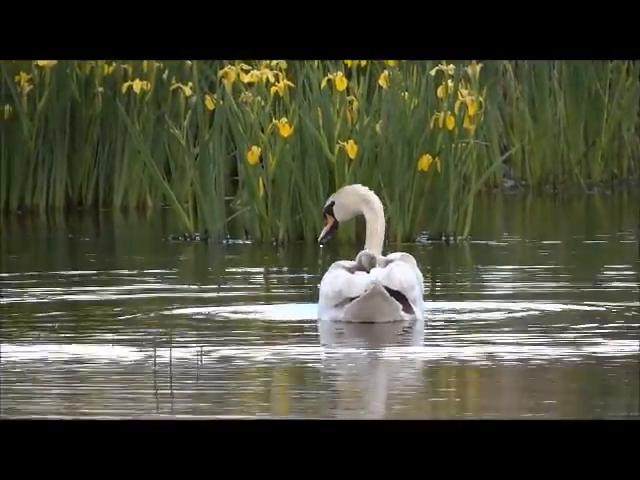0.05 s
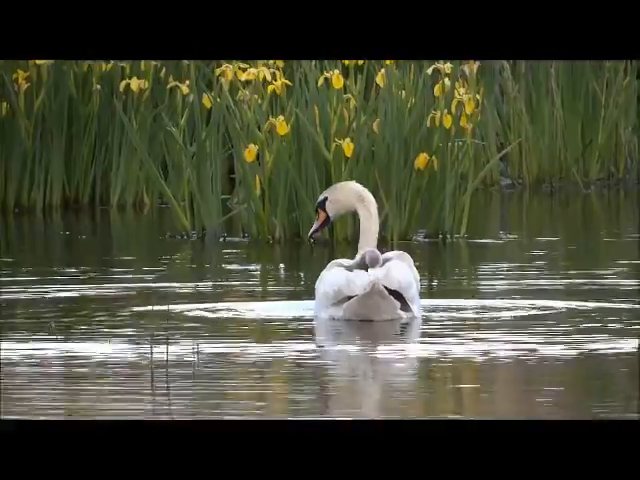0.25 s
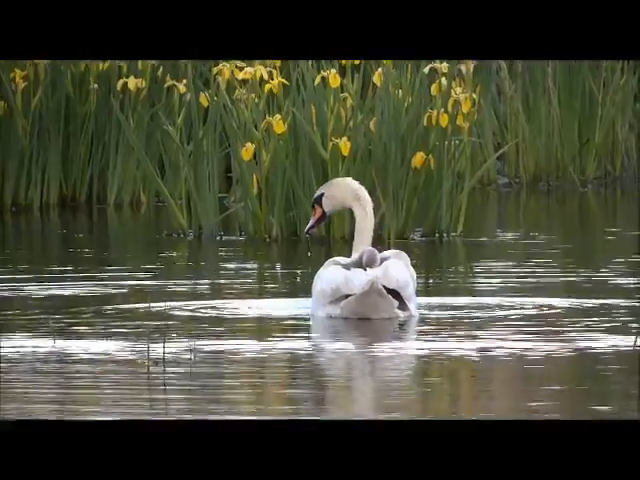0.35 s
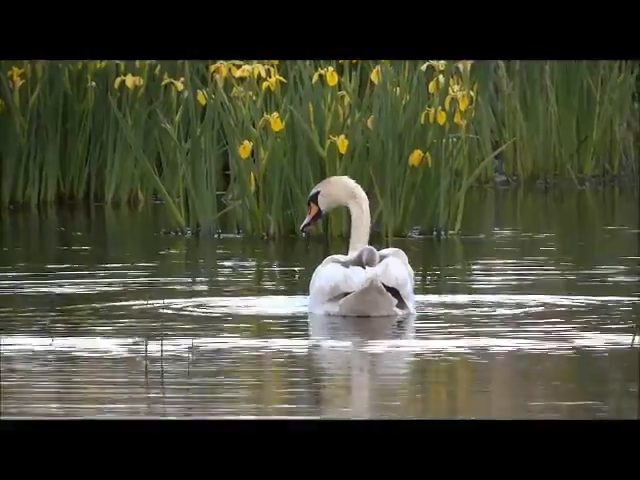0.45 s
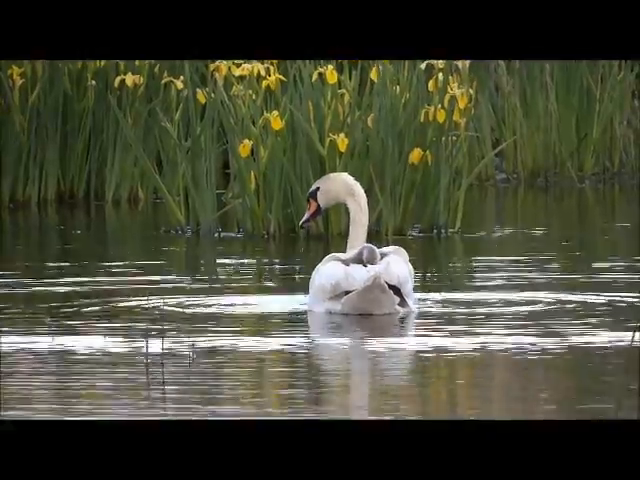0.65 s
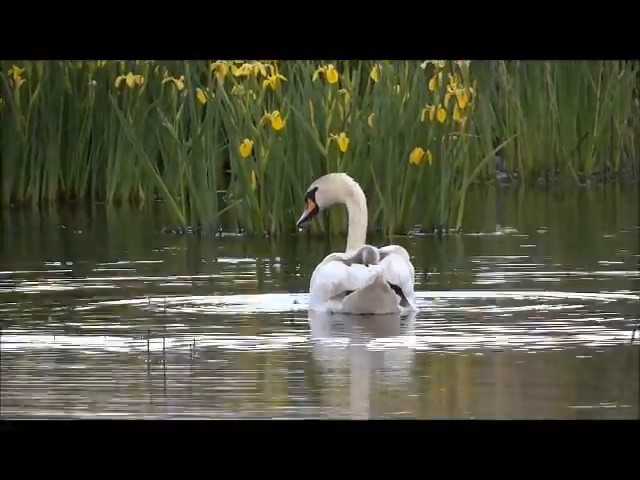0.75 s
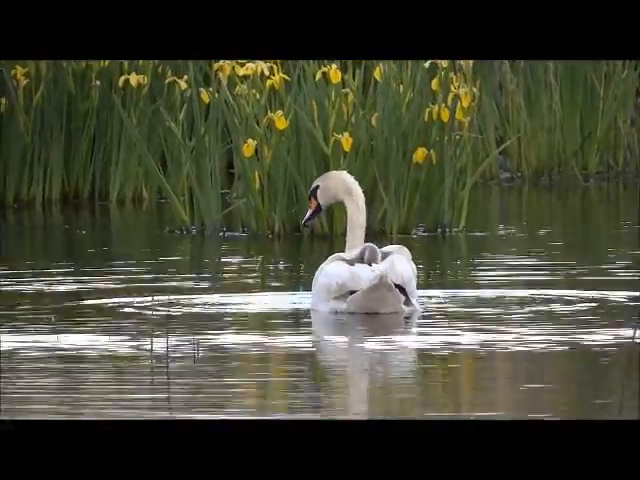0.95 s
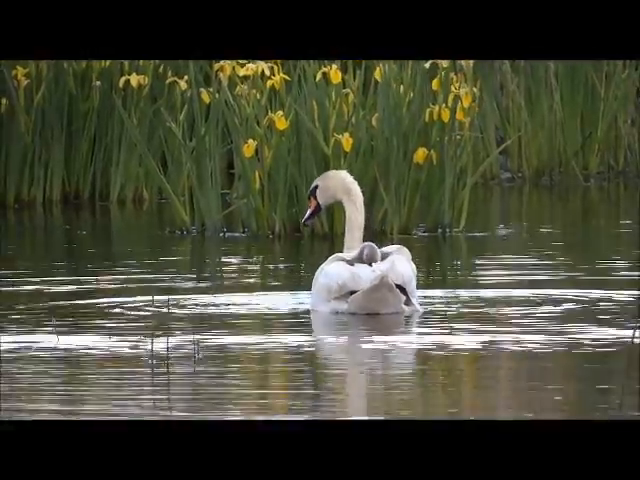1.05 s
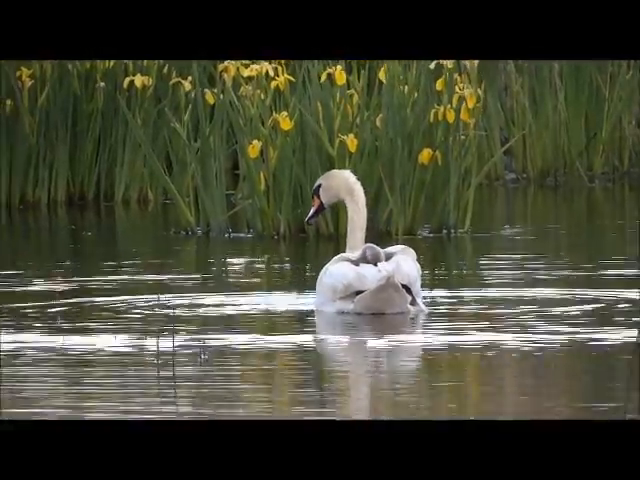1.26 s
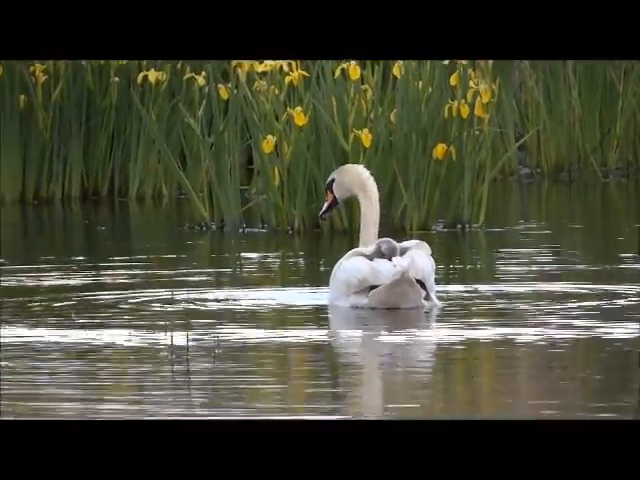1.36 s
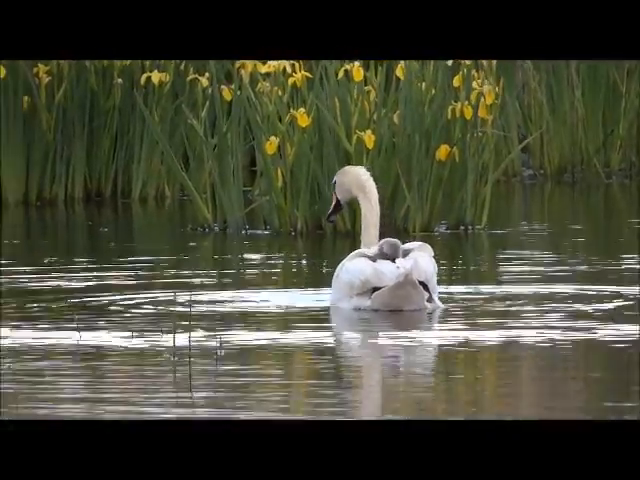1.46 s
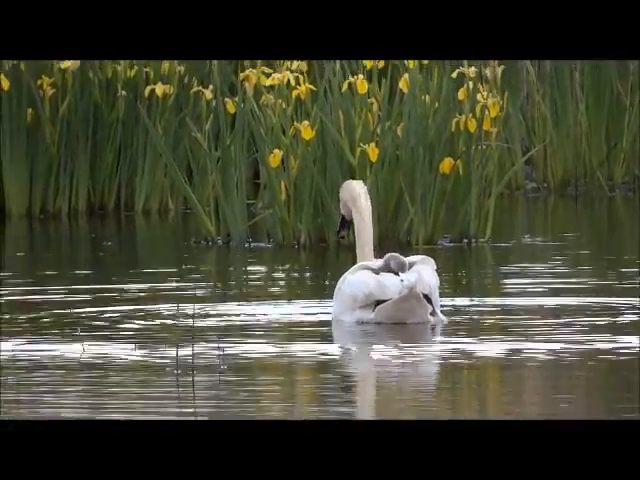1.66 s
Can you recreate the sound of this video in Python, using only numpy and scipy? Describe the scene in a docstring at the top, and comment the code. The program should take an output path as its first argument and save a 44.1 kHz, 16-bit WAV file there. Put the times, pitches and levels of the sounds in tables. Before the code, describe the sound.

One sharp swan snort on a quiet pond, then faint chirps and microphone handling clicks.

```python
"""Swan snort on a quiet pond

A swan gives one short, hissing snort: quick spurts of air through its resonant airway.
Further off a small bird whistles arched chirps and slurs; both echo from the banks.
Close by, a handled camera clicks, knocks and rubs, all over a soft outdoor wash."""
import sys
import numpy as np
from scipy import signal
from scipy.fft import rfft, irfft
from scipy.io import wavfile
from scipy.ndimage import uniform_filter1d

SR = 44100
rng = np.random.default_rng(int(sys.argv[2]) if len(sys.argv) > 2 else 0)


def master(y):
    """Save y as 16-bit WAV."""
    cut = np.clip(np.atleast_2d(y).T, -1, 1)
    pcm = np.round(cut * 32767)  # scale
    wavfile.write(sys.argv[1], SR, pcm.astype(np.int16))


N = 74970
TIME_S = np.arange(N) / SR
FREQ_HZ = np.fft.rfftfreq(N, 1 / SR)


def amp(db):
    """Decibels to gain."""
    return 10 ** (np.asarray(db) / 20)


def unit(x):
    """Scale to rms 1."""
    return x / np.sqrt(np.mean(x ** 2) + 1e-20)


def curve(points, hz=FREQ_HZ):
    """Table interpolated over log frequency."""
    f, value = np.transpose(points)
    return np.interp(np.log(hz + 1), np.log(f + 1), value)


def fader(points):
    """Gain over time from a dB curve."""
    return amp(np.interp(TIME_S, *np.transpose(points)))


def pan(db):
    """Stereo gains for a left-minus-right level."""
    return amp(np.array([[.5], [-.5]]) * db)


def noise(gain, correlation):
    """Stereo noise, rms 1, of given spectral shape and L/R correlation."""
    mid, side = rfft(rng.standard_normal((2, N)))
    alike = np.clip(curve(correlation), -1, 1)
    mid, side = mid * np.sqrt(1 + alike), side * np.sqrt(1 - alike)
    return unit(irfft(np.array([mid + side, mid - side]) * gain, N))


def burst(start, rise, t60):
    """Envelope: linear rise, exponential fall."""
    t = TIME_S - start
    return np.clip(t / rise, 0, 1) * np.exp(-np.log(1000) * np.maximum(t - rise, 0) / t60)


def ring(start, hz, t60, rise_s=0.00098):
    """One decaying mode."""
    return burst(start, rise_s, t60) * np.sin(2 * np.pi * hz * (TIME_S - start))


# wash spectrum: f/Hz, relative level/dB
WASH_SPECTRUM = [(15, -17), (25, -6.5), (70, -2.5), (405, -5.5), (560, -4.5), (936, -8), (1790, -11.5),
                 (2350, -13.5), (2760, -15), (3430, -17.5), (4400, -17.5), (4950, -22), (11300, -28.5),
                 (16000, -32.5)]
# wash envelope: t/s, level/dB
WASH_ENVELOPE = [(0, -47), (.17, -48.5), (.6, -49), (1.0, -50), (1.25, -49), (1.35, -47.5), (1.55, -49.5),
                 (1.7, -49.5)]
# outdoor stereo field: f/Hz, L/R correlation
OUTDOOR_CORRELATION = [(30, 0.95), (120, 0.91), (300, 0.14), (700, 0.12), (2000, 0.4), (5000, 0.63),
                       (9000, 0.96), (12000, 1)]

def wash(patch_db=1.5):
    """Soft noise of air, reeds and water, drifting in patches of time and frequency."""
    air = noise(amp(curve(WASH_SPECTRUM)), OUTDOOR_CORRELATION)
    cells = signal.stft(air, nperseg=512)[2]
    patches = uniform_filter1d(rng.standard_normal(cells.shape[1:]), size=5, axis=0)
    patches = unit(uniform_filter1d(patches, size=10, axis=1))
    air = signal.istft(cells * amp(patch_db * patches), nperseg=512)[1][:, :N]
    return unit(air) * fader(WASH_ENVELOPE)


# clicks: t/s, thud/dB, body/dB, edge/dB, snap/dB, top/dB, low ring/dB, high ring/dB, t60/s, L-R/dB
CAMERA_CLICKS = [(0.0194, -45, -34.5, -39, -55, -61, -32.5, -29, 0.031, -2.5),
                 (0.1912, -38, -43.5, -53, -53, -68, -71, -51, 0.019, 3),
                 (1.2193, -56, -62, -45, -66, -70, -68, -51.5, 0.011, -5),
                 (1.2818, -47, -35, -37, -40, -40, -56, -57, 0.014, -1.5),
                 (1.291, -69, -63, -40, -48, -59, -60, -63, 0.011, -5),
                 (1.3046, -46.5, -46, -50, -46, -51, -62, -64, 0.016, -6),
                 (1.3626, -71, -43.5, -44, -70, -73, -36, -39, 0.029, -0.5),
                 (1.4162, -48, -28.5, -30, -40.5, -45.5, -27.5, -23.5, 0.015, -3),
                 (1.4427, -41, -31, -44, -72, -64, -31, -42, 0.01, -2),
                 (1.6022, -43, -43.5, -41.5, -48.5, -57, -45, -47, 0.024, -6.5),
                 (1.681, -56, -41.5, -41, -35.5, -57, -47, -45, 0.02, -5.5),
                 (1.6874, -45.5, -65, -40, -50, -55, -53, -58, 0.019, -2)]
# noise bands, thud to top: centre/Hz, half width/ln(f ratio)
CLICK_NOISE_BANDS = [(150, 0.44), (1000, 0.5), (2500, 0.41), (5500, 0.31), (11500, 0.23)]
# shell modes: f/Hz, relative level/dB, t60/s
SHELL_MODES = [(491, -16, 0.094), (740, -12, 0.01), (1140, 1, 0.012), (1400, -15, 0.01),
               (2583, -9.5, 0.015), (2684, 2, 0.015)]
# handling stereo field: f/Hz, L/R correlation
CAMERA_CORRELATION = [(150, 0.23), (1000, 0.086), (3000, 0.87), (7000, 0.26), (12000, 1)]

def camera_clicks(rise_s=0.00028, tail_db=-20, split_hz=2000):
    """Each click of the camera: a brief rattle, a ring of the shell and a low thud."""
    out = np.zeros((2, N))
    thud_band, *bands = [noise(1 / (1 + (np.log((FREQ_HZ + 1) / hz) / width) ** 4), CAMERA_CORRELATION)
                         for hz, width in CLICK_NOISE_BANDS]
    for start, thud_db, *rattle_db, low_db, high_db, t60, side_db in CAMERA_CLICKS:
        envelope = burst(start, rise_s, t60) + amp(tail_db) * burst(start, rise_s, t60=0.065)
        rattle = envelope * sum(amp(db) * band for db, band in zip(rattle_db, bands))
        shell = sum(amp(db + (low_db if hz < split_hz else high_db)) * ring(start, hz, mode_t60)
                    for hz, db, mode_t60 in SHELL_MODES)
        thud = amp(thud_db) * burst(start, rise_s, t60=0.054) * thud_band
        out += pan(side_db) * (rattle + shell + thud)
    return out


def whistle(hz, progress, roughness, width_hz=510):
    """Note that swells and fades over progress 0-1; roughness trades tone for narrowband noise."""
    lowpass = signal.butter(2, width_hz / 2, fs=SR, output="sos")
    smear = signal.sosfilt(lowpass, rng.standard_normal((2, N)))
    phase = 2 * np.pi * np.cumsum(hz) / SR
    fuzz = unit(smear[0] * np.sin(phase) + smear[1] * np.cos(phase))
    swell = np.sqrt(np.maximum(np.sin(np.pi * np.clip(progress, 0, 1)), 0))
    return swell * (np.sqrt(1 - roughness) * np.sin(phase) + np.sqrt(roughness / 2) * fuzz)


# arched chirps: apex t/s, apex f/Hz, level/dB
BIRD_CHIRPS = [(.504, 3724, -45), (.621, 3730, -47), (0.74, 3690, -47), (.858, 3685, -46.5)]
# slurs: t/s, length/s, start f/Hz, end f/Hz, level/dB, roughness/0-1
BIRD_SLURS = [(0.082, 0.039, 3070, 3880, -49.5, 0.2), (0.096, 0.04, 4220, 5250, -54.5, 0.9),
              (0.146, 0.03, 4090, 2860, -49.5, 0.8), (0.572, 0.033, 2500, 2270, -55, 0.4),
              (1.082, 0.033, 4290, 2846, -50, 1), (1.297, .11, 3033, 1934, -51.5, 0.93),
              (1.398, 0.13, 2100, 1640, -52.5, 0.2)]
# long whistle, climbing then holding: t/s, f/Hz
LONG_PITCH = [(1.158, 2890), (1.196, 4040), (1.246, 4430), (1.305, 4280)]

def bird(up_s=0.018, down_s=0.0125, arch_hz=794, long_db=-54.5, echo_db=-7.5):
    """A small bird whistles a run of chirps among softer slurs and one long note, with echo."""
    song = np.zeros(N)
    for apex, hz, db in BIRD_CHIRPS:
        t = TIME_S - apex
        drop = np.clip(np.maximum(-t / up_s, t / down_s), 0, 1)
        song += amp(db) * whistle(hz - arch_hz * drop, (t + up_s) / (up_s + down_s), roughness=0.15)
    for start, length, start_hz, end_hz, db, roughness in BIRD_SLURS:
        progress = np.clip((TIME_S - start) / length, 0, 1)
        song += amp(db) * whistle(start_hz * (end_hz / start_hz) ** progress, progress, roughness)
    times, pitch_hz = np.transpose(LONG_PITCH)
    progress = (TIME_S - times[0]) / (times[-1] - times[0])
    song += amp(long_db) * whistle(np.interp(TIME_S, times, pitch_hz), progress, roughness=0.95)
    song = np.array([song, song])
    return song + amp(echo_db) * bank_echo(song)


# echo decay: f/Hz, t60/s
BANK_DECAY = [(200, 1), (1500, 0.54), (3000, 0.57), (7000, 0.36), (14000, 0.062)]

def bank_echo(dry):
    """Diffuse echo from reeds and trees, treble dying first."""
    hz, t, cells = signal.stft(noise(1, OUTDOOR_CORRELATION), SR, nperseg=256)
    decay = np.exp(-np.log(1000) * t / curve(BANK_DECAY, hz)[:, None])
    tail = signal.istft(cells * decay, SR, nperseg=256)[1]
    return signal.fftconvolve(dry, tail / np.linalg.norm(tail[0]), axes=1)[:, :N]


# knocks: t/s, f/Hz, level/dB, t60/s
HAND_KNOCKS = [(.191, 214, -41, 0.12), (1.2825, 750, -37, 0.027), (1.2915, 4300, -41.5, .02),
               (1.418, 188, -37.5, 0.1), (1.4433, 1043, -29.5, 0.023), (1.445, 106, -42.5, 0.068),
               (1.4473, 417, -34, 0.023), (1.461, 64, -36.5, 0.087), (1.601, 183.5, -38, 0.085)]

def hand_knocks():
    """The hand bumps the camera; each knock rings at one pitch."""
    return sum(amp(db) * ring(start, hz, t60) for start, hz, db, t60 in HAND_KNOCKS)


def resonance(centre_hz, width_hz):
    """Resonance shape, 1 at its centre."""
    return 1 / (1 + (2 * (FREQ_HZ - centre_hz) / width_hz) ** 2)


# air spurts: t/s, level/dB, rise/s, t60/s, bass/dB, throat/dB, nasal/dB, sibilance/dB, treble/dB,
# airway lift factor, pop/dB
SNORT_SPURTS = [(.212, -36, 0.00091, 0.25, -8, -6, 8, 11, -9, 1.5, -16),
                (0.2251, -25.5, 0.0015, 0.17, -7.5, -3, 18.5, 4, -2.5, 1.04, -16),
                (0.2374, -22.5, 0.0027, 0.26, -4, -2, -3.5, 3.5, -4, 1.3, 1),
                (0.2825, -22.5, 0.0011, 0.18, 0.5, 11, 15.5, 3.5, 4.5, 0.6, -6),
                (0.3081, -23.5, 0.0017, 0.18, -7, -11, -6, -2.5, -1.5, 1.42, -5),
                (0.32, -26.5, 0.0028, 0.25, -0.5, 2, -13, 0, 0, 0.94, -0.5)]
# hiss spectrum: f/Hz, relative level/dB
HISS_SPECTRUM = [(100, -12.5), (560, -13.5), (730, -2.5), (1050, -4.5), (2000, -1.5), (3000, -2),
                 (3700, -4), (6000, -4), (8700, -2.5), (10800, -7), (12500, -12), (15500, -20.5)]
# airway resonances: f/Hz, width/Hz, nominal lift/dB
AIRWAY_MODES = [(1870, 34, 6.5), (2485, 41, 14.5), (2665, 44, 9.5), (2920, 23, 6.5), (3047, 32, 4.5),
                (4260, 460, 2)]
# snort stereo field: f/Hz, L/R correlation
SNORT_CORRELATION = [(300, 0.3), (1400, 0.94), (2800, 0.7), (4500, 0.9), (8000, .86), (10000, 0.77),
                     (12000, 1.05)]
# snort balance: f/Hz, L-R/dB
SNORT_BALANCE = [(300, -2), (1300, 3.5), (2400, 3.5), (4400, 1), (14000, 0)]

def swan_snort(rasp_hz=1300, rasp_linger=1.5, grain_db=0.93, grain_s=0.00246, echo_db=-14):
    """Abrupt spurts of turbulent air through a resonant airway that opens differently for each."""
    airway_db = sum(db * resonance(hz, width) for hz, width, db in AIRWAY_MODES)
    throat = resonance(centre_hz=760, width_hz=85)
    nasal = resonance(centre_hz=1454, width_hz=203)
    bass = 1 / (1 + (FREQ_HZ / 1830) ** 4)
    sibilance = 1 / (1 + ((FREQ_HZ - 5650) / 2200) ** 6)
    treble = 1 - 1 / (1 + (FREQ_HZ / 7460) ** 10)
    out = np.zeros((2, N))
    for start, db, rise, t60, *voicing in SNORT_SPURTS:
        bass_db, throat_db, nasal_db, sibilance_db, treble_db, lift, pop_db = voicing
        hiss_db = curve(HISS_SPECTRUM) + bass_db * bass + sibilance_db * sibilance + treble_db * treble
        gain = amp(hiss_db + lift * airway_db + throat_db * throat + nasal_db * nasal)
        air = noise(gain * pan(curve(SNORT_BALANCE)), SNORT_CORRELATION)
        low_air = irfft(rfft(air) / (1 + (FREQ_HZ / rasp_hz) ** 2), N)
        hiss = burst(start, rise, t60) * (air - low_air)
        rasp = burst(start, rise, t60 * rasp_linger) * low_air
        pop = burst(start, rise, t60=0.04) * noise(gain * np.sqrt(FREQ_HZ), SNORT_CORRELATION)
        out += amp(db) * (hiss + rasp + amp(pop_db) * pop)
    grain = unit(uniform_filter1d(rng.standard_normal(N), int(grain_s * SR)))
    out *= amp(grain_db * grain)
    return out + amp(echo_db) * bank_echo(out)


# rub envelope: t/s, level/dB
RUB_ENVELOPE = [(1.40, -90), (1.42, -33), (1.435, -52), (1.45, -40), (1.464, -44.5), (1.49, -61),
                (1.52, -90)]
# rub spectrum: f/Hz, relative level/dB
RUB_SPECTRUM = [(40, -10), (150, 0), (550, 4.5), (1200, -3), (3000, -16), (5000, -36), (15000, -50)]

def hand_rub():
    """Dull friction on the camera shell as the grip shifts."""
    return fader(RUB_ENVELOPE) * noise(amp(curve(RUB_SPECTRUM)), CAMERA_CORRELATION)


def scene():
    """The pond as heard from the bank."""
    return wash() + camera_clicks() + bird() + hand_knocks() + swan_snort() + hand_rub()


def record(dry):
    """Band limit at 16 kHz."""
    lowpass = signal.firwin(511, 16000, window=("kaiser", 9), fs=SR)
    return signal.oaconvolve(dry, lowpass[None], "same")


dry = scene()
out = record(dry)
master(out)
```